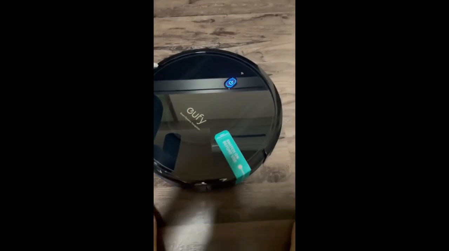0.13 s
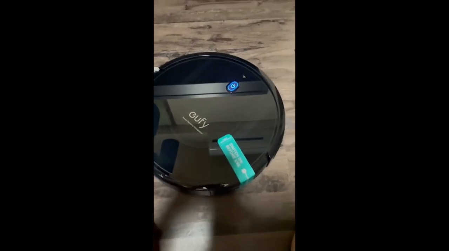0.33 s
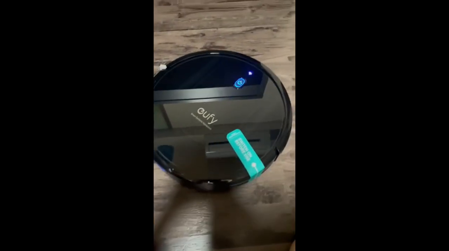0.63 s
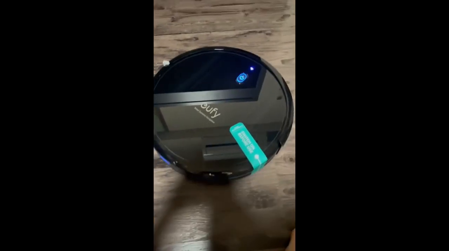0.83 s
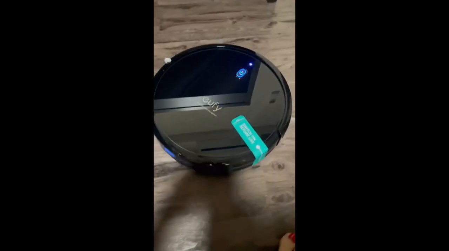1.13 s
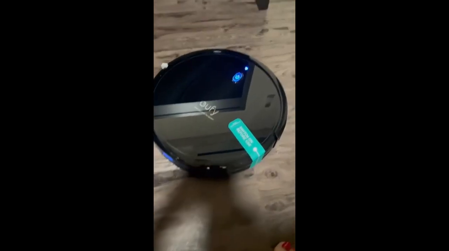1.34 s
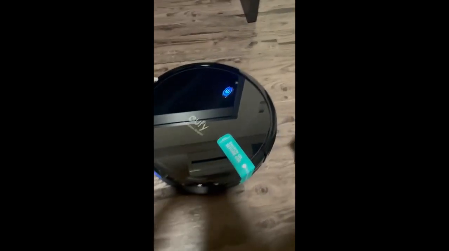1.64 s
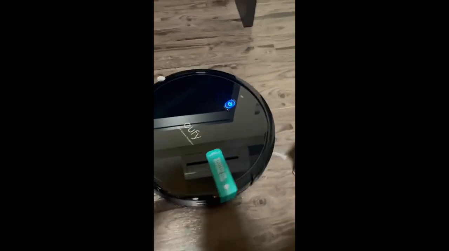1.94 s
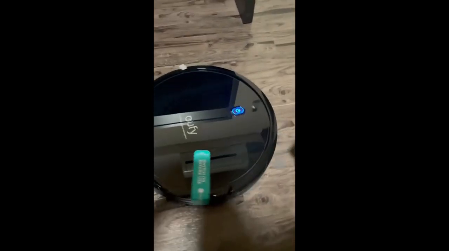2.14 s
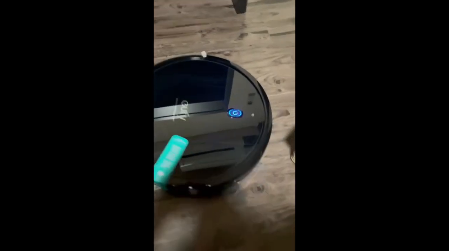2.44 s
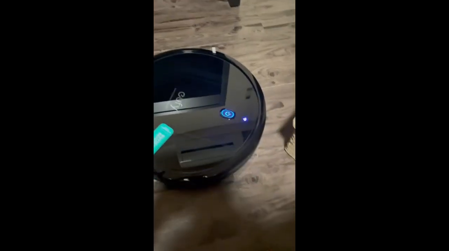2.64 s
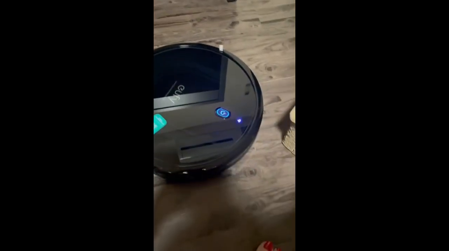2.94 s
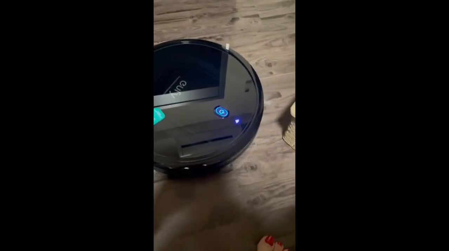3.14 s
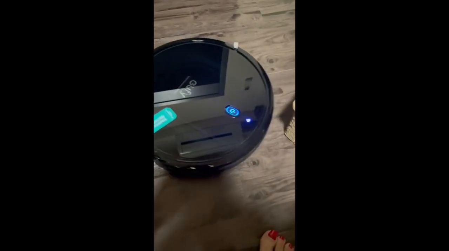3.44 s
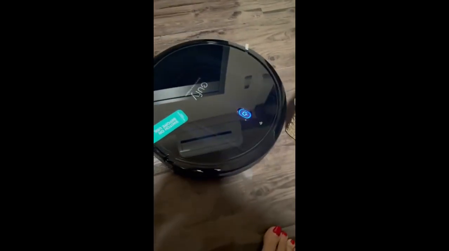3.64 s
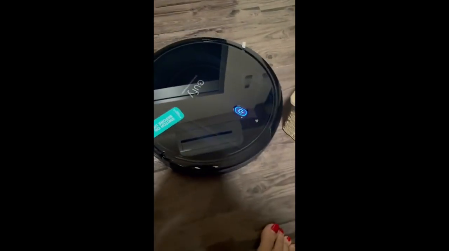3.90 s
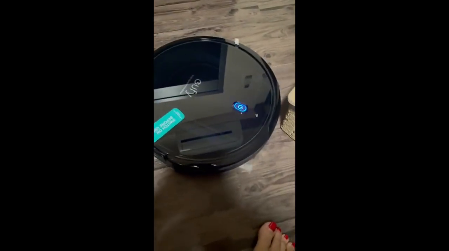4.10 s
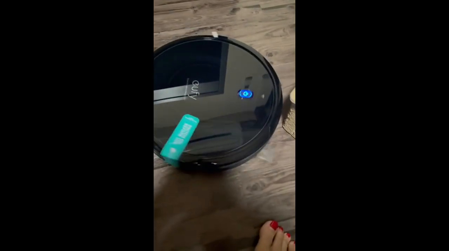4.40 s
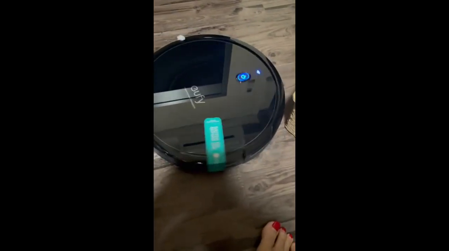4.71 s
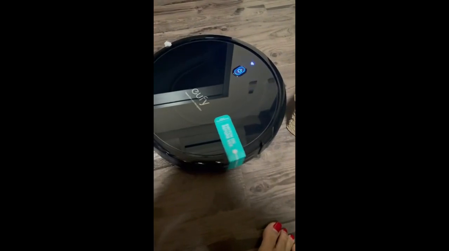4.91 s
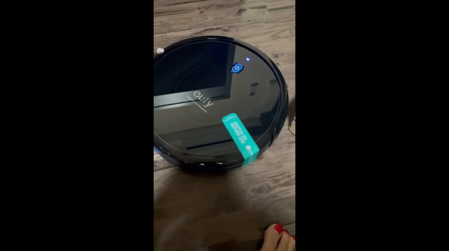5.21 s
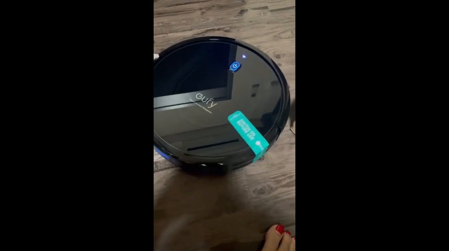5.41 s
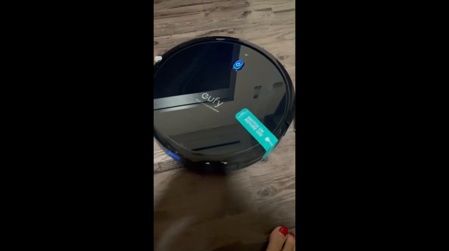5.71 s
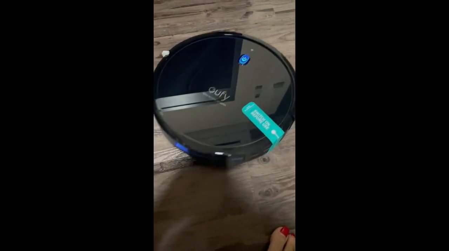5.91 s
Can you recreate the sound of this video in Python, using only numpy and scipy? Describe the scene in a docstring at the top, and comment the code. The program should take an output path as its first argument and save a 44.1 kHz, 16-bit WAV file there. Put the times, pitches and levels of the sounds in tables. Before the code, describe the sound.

A robot vacuum cleaner runs on a wooden floor indoors, heard from just above. Its fan makes a steady rush of air over a motor hum and a low wheel rumble, the tone shifting as it turns. A faint gear whine comes at the start and again near the end. Dull, rattling thumps cluster in the first second, then return around the middle and later. Faint puffs of air brush the microphone.

```python
"""On a wooden floor, a robot vacuum cleaner turns about, heard from just above.
Its suction fan hums and drives turbulent air through the resonant shell and ducts, so the colour
of the rush shifts as the machine swings round. The brush motor drones at multiples of its shaft
rate, the drive gears whine under load and the rolling wheels rumble. Dull, rattling thumps come
now and then, and faint draughts brush the microphones."""
import sys
import numpy as np
from scipy import signal
from scipy.fft import rfft, irfft
from scipy.io import wavfile
from scipy.ndimage import uniform_filter1d

SR = 44100
rng = np.random.default_rng(int(sys.argv[2]) if len(sys.argv) > 2 else 0)


def digitize_waveform(pressure):
    """Quantize a signal to 16-bit integers and store it at the path in sys.argv[1].

    Rows of a 2-D input are taken as channels; values are limited to [-1, 1].
    """
    field = np.atleast_2d(pressure).T
    bounded = np.clip(field, -1, 1)
    quanta = np.round(bounded * 32767).astype(np.int16)
    wavfile.write(sys.argv[1], SR, quanta)


N = 266893
TIME = np.arange(N) / SR
FREQS = np.maximum(np.arange(N // 2 + 1) * SR / N, 1)
SIDES = np.array([[1], [-1]])  # left, right

# Levels in the tables are relative: each source applies its own gain to them.
# how far the machine has swung from its first heading (0 to 1): time_s, swung_share
HEADING = [(0, 0.08), (.8, 0.42), (1.8, 0.32), (2.3, 0.59), (2.8, 0.93), (3.9, 0.74), (4.4, 0.69),
           (4.9, 0.6), (5.4, 0.27), (6.05, 0.19)]
# turbulent air at the first heading: frequency_hz, density_db
AIR_SPECTRUM = [(30, -22.5), (100, -18.5), (170, 2.5), (280, 1.5), (520, -3), (680, -2), (850, -7),
                (1150, -5), (1450, -8.5), (2300, -12.5), (3100, -16), (3800, -21.5), (4300, -23),
                (7300, -34.5)]
# change of its colour when swung round: frequency_hz, gain_db
SWUNG_COLOUR = [(170, -0.5), (320, 2), (450, 1.5), (750, 0.5), (1200, 2), (1700, -0.5), (2600, 2),
                (3700, 2), (5300, 0), (7000, -1)]
# resonances of shell and ducts: centre_hz, width_hz, first_heading_db, swung_db
DUCT_RESONANCES = [(440, 84, 5, -0.5), (650, 24, 2, -2.5), (686, 67, -1.5, 3.5), (860, 81, 3.5, 2.5),
                   (1190, 68, 3, -2), (1770, 270, 4, -0.5), (2420, 200, -1, 7), (2760, 77, 2.5, 3.5),
                   (3460, 96, 4, 0), (3550, 120, 4.5, 1.5), (3690, 140, 5, 1), (4050, 150, 4.5, -0.5),
                   (4840, 280, 7, 2), (5440, 290, 3, 6), (6050, 330, 6.5, 5.5), (6500, 360, 9, 7),
                   (7050, 650, 7.5, 5)]
# the rush below about 1.2 kHz: time_s, level_db
BODY_LEVEL = [(0, 0), (.6, 0), (1.05, -0.5), (1.35, -1.5), (2.6, -1), (3.4, -1.4), (4.3, -0.8),
              (6.05, -0.5)]
# the rush above about 2.9 kHz: time_s, level_db
TREBLE_LEVEL = [(0, 0.5), (1.05, 0.8), (1.5, 0.5), (2.1, -0.5), (2.8, 1.8), (3.3, 3), (4.3, 1), (5.0, 1.3),
                (6.05, -0.5)]
# breathy swells of the air: peak_s, half_length_s, centre_hz, width_hz, level_db
AIR_SWELLS = [(0.199, 0.63, 1890, 169, -48.5), (.3, 0.11, 6070, 131, -69), (0.48, 0.15, 2730, 320, -45),
              (1.104, .14, 3560, 300, -50.5), (1.402, 0.6, 2270, 340, -47.5), (2.155, 0.44, 1565, 304, -51),
              (2.3, 0.28, 2125, 150, -47), (2.335, 0.11, 3025, 120, -46.5), (4.5, 0.16, 2940, 252, -49),
              (5.203, 1, 2460, 240, -46.5), (5.25, .55, 3470, 300, -53)]
# reflections from floor and furniture: first_heading_delay_s, swung_delay_s, gain_db
REFLECTIONS = [(.0079, 0.0076, -19.5), (0.0135, 0.0159, -14.5)]
# likeness of the noise at left and right: frequency_hz, coherence_ratio
COHERENCE = [(60, .98), (150, .93), (260, .97), (500, .95), (780, .7), (950, .63), (1150, .72), (1400, .91),
             (2050, .94), (2400, .58), (2850, .5), (3150, .22), (3400, .63), (3700, .81), (4000, .68),
             (4400, .17), (5300, .62), (5700, .32), (6400, .44), (6750, .3), (6950, .87)]
# phase by which the left side leads: frequency_hz, lead_rad
LEFT_LEAD = [(100, -.08), (500, -.05), (780, -.25), (1150, -.22), (1400, 0), (2050, .07), (2600, 1.35),
             (3150, 1.45), (3400, .3), (3900, .18), (4300, .95), (4800, .1), (5600, .15), (6050, 1.3),
             (6950, 3.1)]
# level of the left side over the right: frequency_hz, balance_db
LEFT_BALANCE = [(100, 0.1), (600, 0.5), (1050, 4.5), (1450, 0.2), (2600, -0.5), (3300, 1.5), (4600, -1.5),
                (5300, 0.5), (7000, 0)]
# partials of the suction fan: shaft_multiple, level_db
FAN_PARTIALS = [(1, -40), (3, -53), (8, -63.5)]
# partials of the brush motor: shaft_multiple, level_db
BRUSH_PARTIALS = [(1, -45), (5.31, -56), (10, -63.5)]
# high motor partials flare into faint whistles: peak_s, half_length_s, shaft_multiple, boost_db
WHISTLES = [(1.0, .2, 8, 6), (2.35, .17, 10, 12), (2.5, 0.27, 8, 14.5), (4.65, .2, 8, 4.5),
            (5.883, 0.15, 8, 13)]
# partials of the gear whine: mesh_multiple, level_db
GEAR_PARTIALS = [(.5, -8), (.976, -10), (1, -1.5), (1.056, -9), (2, -23)]
# tooth-meshing rate, sagging and recovering with the load: time_s, pitch_hz
MESH_PITCH = [(0, 1212), (.15, 1215), (.35, 1227), (.8, 1233), (1.2, 1234), (1.38, 1225), (1.5, 1232),
              (1.63, 1218), (1.8, 1234), (2.1, 1234), (2.5, 1227), (4.4, 1228), (4.95, 1238), (5.55, 1240),
              (5.63, 1225), (5.85, 1237), (6.05, 1239)]
# spells when the gears whine under load: start_s, end_s, level_db
GEAR_LOADS = [(.05, 1.1, -41), (1.85, 2.1, -42), (4.62, 6.05, -41)]
# colour of the rumble: frequency_hz, density_db
RUMBLE_SPECTRUM = [(15, -30), (32, -12.5), (48, 3.5), (72, 4), (110, -4.5), (170, -12), (300, -28),
                   (700, -52.5)]
# spells of louder rumble: start_s, end_s, level_db
RUMBLE_SPELLS = [(.34, .72, -33.5), (2.85, 3.2, -40), (3.5, 3.75, -41.5), (4.58, 4.92, -40),
                 (5.5, 5.8, -38)]
# modes of the rattling parts: pitch_hz, level_db, t60_s
RATTLE_RESONANCES = [(55, -5, 0.11), (119, -0.5, .06), (165, 0.5, 0.036), (228, -3, .045),
                     (310, -3.5, 0.039)]
# dull thumps and their rattles: start_s, level_db, settled_pitch_hz, swell_s, rattle_db
THUMPS = [(0.262, -23.5, 66.3, .023, -41.5), (0.321, -24, 88, 0.0067, -28),
          (0.347, -10.8, 77.2, 0.032, -25.5), (.372, -19, 44, .026, -30), (0.41, -25.5, 80, 0.011, -33),
          (0.463, -24, 88, .024, -31), (.528, -20.5, 99, .0082, -32), (.581, -14.5, 57.7, .035, -23),
          (0.633, -21.5, 87.3, 0.0094, -31), (0.649, -15.5, 182.3, .0065, -29.5),
          (0.66, -21, 95, 0.011, -36.5), (.706, -27, 58.3, 0.028, -38), (.996, -26.5, 58.4, .025, -37),
          (1.909, -27, 78.4, .027, -28.5), (2.751, -23, 85, 0.0062, -36), (2.803, -23.5, 75, 0.007, -39),
          (2.846, -29, 80, 0.036, -33), (2.926, -29, 72, 0.013, -32.5), (3.026, -17.5, 66.4, 0.017, -26),
          (3.114, -21, 66, 0.014, -28), (3.2, -27.5, 84, 0.013, -42), (3.455, -15.5, 70, 0.014, -27.5),
          (3.632, -23, 70, 0.012, -30), (3.689, -19.5, 106, 0.016, -24), (3.714, -21, 58, .015, -36),
          (3.896, -24.5, 72, .018, -33), (4.553, -19, 76, 0.025, -24.5), (4.641, -19.5, 70.4, 0.013, -31),
          (4.684, -22, 72, .025, -32), (4.819, -23, 78, 0.029, -31), (4.896, -24, 80, 0.013, -37.5),
          (5.135, -25, 56, .021, -37), (5.592, -22, 90, 0.013, -33.5), (5.719, -23, 62, 0.027, -32),
          (5.895, -21, 69, 0.028, -30.5), (5.979, -24.5, 61.6, 0.015, -33)]
# puffs of air on the microphones: start_s, end_s, level_db
DRAUGHT_SPELLS = [(.58, .75, -50), (1.08, 1.36, -44), (1.62, 1.95, -47.5), (2.99, 3.14, -41),
                  (3.25, 3.82, -50.5), (5.32, 5.47, -44.5)]
# colour of those puffs: frequency_hz, density_db
DRAUGHT_SPECTRUM = [(15, -12.5), (40, -0.5), (80, 4), (160, -2.5), (300, -14), (450, -20), (900, -38),
                    (3000, -51)]


def from_db(db):
    """Amplitude ratio of a level in decibels."""
    return 10 ** (np.asarray(db) / 20)


def unit_rms(x):
    """Normalisation to unit mean power."""
    return x / np.sqrt(np.mean(x ** 2) + 1e-20)


def over_time(points):
    """Linear interpolation of a curve at every sample."""
    return np.interp(TIME, *np.transpose(points))


def over_hz(points):
    """Interpolation of a spectrum along logarithmic frequency."""
    hz, value = np.transpose(points)
    return np.interp(np.log(FREQS), np.log(hz), value)


def drift(rate_hz):
    """Low-passed noise: a slow random fluctuation of unit power."""
    step = 50
    white = rng.standard_normal(N // step + 2)
    hz = np.fft.rfftfreq(len(white), step / SR)
    slow = irfft(rfft(white) / (1 + (hz / rate_hz) ** 2), len(white))
    return np.interp(np.arange(N) / step, np.arange(len(slow)), unit_rms(slow))


def resonance(hz, width_hz):
    """Lorentzian resonance curve, 1 at its centre."""
    return 1 / (1 + (2 * (FREQS - hz) / width_hz) ** 2)


def bell(peak_s, half_length_s):
    """Gaussian envelope, down to 1/e at half_length_s from its peak."""
    return np.exp(-((TIME - peak_s) / half_length_s) ** 2)


def spells(rows, rise_s, fall_s):
    """Trapezoidal envelopes, each at full level from its start to its end."""
    return sum(from_db(db) * np.interp(TIME, [start - rise_s, start, end, end + fall_s], [0, 1, 1, 0])
               for start, end, db in rows)


def pulse(start_s, swell_s):
    """Envelope with a quadratic onset and Gaussian decay, reaching 1 after swell_s."""
    rise = (np.maximum(TIME - start_s, 0) / swell_s) ** 2
    return rise * np.exp(1 - np.minimum(rise, 20))


def stereo_noise():
    """Partial coherence: a noise spectrum mixed for two microphones from sum and difference parts."""
    mid, side = rfft(rng.standard_normal((2, N)))
    coherence = over_hz(COHERENCE)
    pair = np.sqrt(1 + coherence) * mid + SIDES * np.sqrt(1 - coherence) * side
    balance = from_db(SIDES * over_hz(LEFT_BALANCE) / 2)
    return pair * balance * np.exp(.5j * SIDES * over_hz(LEFT_LEAD))


def air_rush(gain_db, flicker_db, swish_db, exhaust_db):
    """Duct resonances filter turbulence; as the machine turns, other openings face the listener."""
    swung = over_time(HEADING)
    turbulence = stereo_noise() * from_db(over_hz(AIR_SPECTRUM))
    first_db = sum(db * resonance(hz, width) for hz, width, db, _ in DUCT_RESONANCES)
    turned_db = sum(db * resonance(hz, width) for hz, width, _, db in DUCT_RESONANCES)
    first = turbulence * from_db(first_db)
    turned = turbulence * from_db(over_hz(SWUNG_COLOUR) + turned_db)
    body = 1 / (1 + (FREQS / 1200) ** 6)
    exhaust = 1 - 1 / (1 + (FREQS / 2900) ** 8)
    swish = 1 - body - exhaust
    out = 0
    for share, db in [(body, over_time(BODY_LEVEL)), (swish, swish_db),
                      (exhaust, exhaust_db + over_time(TREBLE_LEVEL))]:
        band = (1 - swung) * irfft(first * share, N) + swung * irfft(turned * share, N)
        out += band * from_db(db + flicker_db * drift(rate_hz=27))
    return from_db(gain_db) * out / irfft(first, N).std()


def waver(x, depth_db, rate_hz, full_depth_hz):
    """Random amplitude modulation: narrow bands wax and wane, most deeply in the treble."""
    hz, frame_s, cells = signal.stft(x, SR, nperseg=1024)
    frames = len(frame_s)
    pole = np.exp(-2 * np.pi * rate_hz * (frame_s[1] - frame_s[0]))
    white = rng.standard_normal((len(hz), 3 * frames))
    slow = signal.filtfilt([1 - pole], [1, -pole], white)[:, frames:2 * frames]
    slow = unit_rms(uniform_filter1d(slow, size=2, axis=0))  # neighbouring bands move partly together
    gain = from_db(depth_db * slow * np.minimum(hz / full_depth_hz, 1)[:, None])
    return signal.istft(cells * gain, SR, nperseg=1024)[1][:, :N]


def air_swells():
    """Band-limited noise under slow envelopes: narrow parts of the rush rise and sink."""
    noise = stereo_noise()
    out = 0
    for peak_s, half_length_s, hz, width_hz, db in AIR_SWELLS:
        band = unit_rms(irfft(noise * resonance(hz, width_hz) ** 2, N))
        out += from_db(db) * bell(peak_s, half_length_s) * band
    return out


def reflections(x):
    """Comb filtering: direct sound interferes with echoes whose paths change as the machine turns."""
    swung = over_time(HEADING)
    out = x
    for first_s, turned_s, db in REFLECTIONS:
        sent_s = TIME - first_s - (turned_s - first_s) * swung
        out = out + from_db(db) * np.array([np.interp(sent_s, TIME, channel) for channel in x])
    return out


def rotor(hz, partials, wobble_share, flutter_db, flutter_hz):
    """Rotation locks partials to one wavering rate; each flutters in level on its own."""
    angle = 2 * np.pi * np.cumsum(hz * (1 + wobble_share * drift(rate_hz=5.47))) / SR
    out = 0
    for multiple, db in partials:
        amplitude = np.sqrt(2) * from_db(db + flutter_db * drift(flutter_hz))
        out += amplitude * np.sin(multiple * angle + rng.uniform(0, 2 * np.pi))
    return out


def with_whistles(partials):
    """Level modulation lifts a high motor partial briefly into a whistle."""
    for multiple, db in partials:
        boost_db = sum(up_db * bell(peak_s, half_length_s)
                       for peak_s, half_length_s, flaring, up_db in WHISTLES if flaring == multiple)
        yield multiple, db + boost_db


def suction_fan(shaft_hz, gain_db, swung_db):
    """Harmonics of the shaft rate make a hum, louder as the machine swings round."""
    hum = rotor(shaft_hz, with_whistles(FAN_PARTIALS), wobble_share=.0011, flutter_db=2.1, flutter_hz=20)
    return from_db(gain_db + swung_db * over_time(HEADING)) * hum


def brush_motor(shaft_hz, gain_db):
    """Nearly steady rotation radiates a drone at multiples of the shaft rate."""
    partials = with_whistles(BRUSH_PARTIALS)
    return from_db(gain_db) * rotor(shaft_hz, partials, wobble_share=.002, flutter_db=2.5, flutter_hz=4.8)


def drive_gears(gain_db, idle_db, teeth, rasp_db, throb_depth, pan_db, left_lag_s):
    """Meshing teeth whine, louder under load; their unevenness adds a rasp that throbs once a turn."""
    mesh_hz = over_time(MESH_PITCH)
    load = from_db(idle_db) + spells(GEAR_LOADS, rise_s=.42, fall_s=.42)
    throb = 1 + throb_depth * np.sin(2 * np.pi * np.cumsum(mesh_hz / teeth) / SR)
    smear = irfft(rfft(rng.standard_normal(N)) * resonance(mesh_hz.mean(), width_hz=170) ** 2, N)
    rasp = from_db(rasp_db) * unit_rms(throb * smear)
    whine = rotor(mesh_hz, GEAR_PARTIALS, wobble_share=.0018, flutter_db=3.0, flutter_hz=25)
    gears = from_db(gain_db) * load * (whine + rasp)
    left = np.interp(TIME - left_lag_s, TIME, gears)
    return np.array([left, gears]) * from_db(pan_db * SIDES / 2)


def room(x, wet_db, t60_s):
    """Diffuse reverberation: an exponentially decaying tail, independent at each microphone."""
    tail = rng.standard_normal((2, SR // 2)) * from_db(-60 * TIME[:SR // 2] / t60_s)
    tail /= np.sqrt(np.sum(tail ** 2, axis=1, keepdims=True))
    return x + from_db(wet_db) * signal.fftconvolve(x * np.ones((2, 1)), tail, axes=1)[:, :N]


def wheel_rumble(gain_db, roll_db, swung_db):
    """Low rolling noise adds in power to louder spells that gather round the thumps."""
    rolling = from_db(roll_db + swung_db * over_time(HEADING))
    envelope = np.hypot(rolling, spells(RUMBLE_SPELLS, rise_s=.17, fall_s=.18))
    noise = irfft(stereo_noise() * from_db(over_hz(RUMBLE_SPECTRUM)), N)
    return from_db(gain_db) * envelope * unit_rms(noise)


def rattle(gain_db, contacts_per_s, lead_s, swell_s):
    """Random contacts excite damped low modes, in a short run beginning just before each thump."""
    strikes = rng.random(N) < contacts_per_s / SR
    contacts = strikes * rng.standard_normal((len(RATTLE_RESONANCES), N))
    ringing = 0
    for clicks, (hz, db, t60_s) in zip(contacts, RATTLE_RESONANCES):
        radius, angle = from_db(-60 / (t60_s * SR)), 2 * np.pi * hz / SR
        feedback = [1, -2 * radius * np.cos(angle), radius ** 2]
        ringing += from_db(db) * signal.lfilter([0, np.sin(angle)], feedback, clicks + 1e-18)
    envelope = sum(from_db(db) * pulse(start_s - lead_s, swell_s) for start_s, *_, db in THUMPS)
    return from_db(gain_db) * unit_rms(ringing) * envelope


def thumps(gain_db, sharp_share, settle_s):
    """Heavily damped oscillation: a soft, heavy push swells, sinks in pitch and dies in a few cycles."""
    out = np.zeros(N)
    for start_s, db, hz, swell_s, _ in THUMPS:
        age_s = np.maximum(TIME - start_s, 0)
        cycles = hz * (age_s + sharp_share * settle_s * (1 - np.exp(-age_s / settle_s)))
        out += from_db(db + gain_db) * pulse(start_s, swell_s) * np.sin(2 * np.pi * cycles)
    return out


def draughts(gain_db):
    """Puffs of air brush each microphone separately; uncorrelated pressures sound wide."""
    noise = irfft(rfft(rng.standard_normal((2, N))) * from_db(over_hz(DRAUGHT_SPECTRUM)), N)
    return from_db(gain_db) * spells(DRAUGHT_SPELLS, rise_s=.037, fall_s=.057) * unit_rms(noise)


def scene():
    """Superposition of the rush, the motor tones, the rumble, the knocks and the draughts."""
    flow = air_rush(gain_db=-32.5, flicker_db=1.0, swish_db=-0.63, exhaust_db=-0.52)
    flow = waver(flow, depth_db=3.0, rate_hz=14.0, full_depth_hz=2800)
    rush = reflections(flow + air_swells())
    fan = suction_fan(shaft_hz=241.7, gain_db=-2.0, swung_db=3.0)
    brush = brush_motor(shaft_hz=300.3, gain_db=-0.5)
    gears = drive_gears(gain_db=-3.5, idle_db=-53.5, teeth=18, rasp_db=-7, throb_depth=0.9,
                        pan_db=1.0, left_lag_s=45e-6)
    hum = room(fan + brush + gears, wet_db=-29.0, t60_s=0.54)
    thuds = thumps(gain_db=0.4, sharp_share=0.81, settle_s=0.01)
    rattles = rattle(gain_db=0.5, contacts_per_s=220, lead_s=.008, swell_s=.02)
    knocks = room(thuds + rattles, wet_db=-22.5, t60_s=0.33)
    rumble = wheel_rumble(gain_db=2.0, roll_db=-41.5, swung_db=-5.5)
    return rush + hum + rumble + knocks + draughts(gain_db=4.0)


def record(dry):
    """An elliptic low-pass filter cuts the top steeply."""
    cutoff_hz = 7480
    return signal.sosfilt(signal.ellip(12, .1, 80, cutoff_hz, fs=SR, output="sos"), dry)


dry = scene()
out = record(dry)
digitize_waveform(out)
```